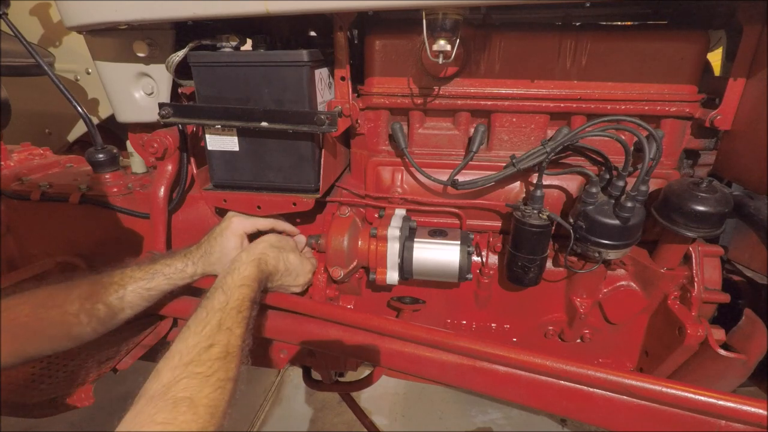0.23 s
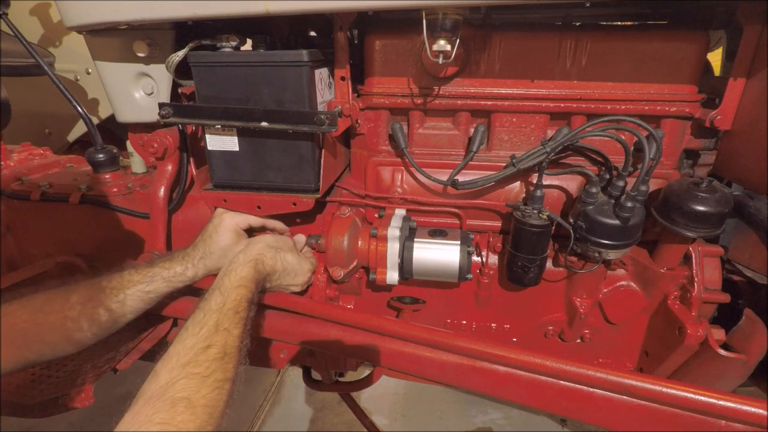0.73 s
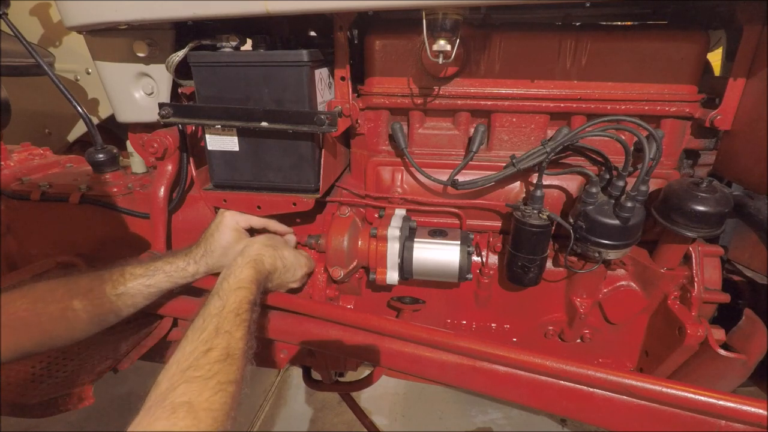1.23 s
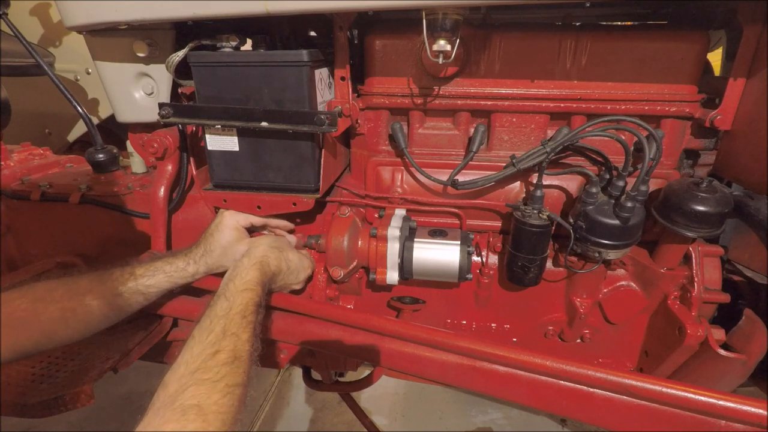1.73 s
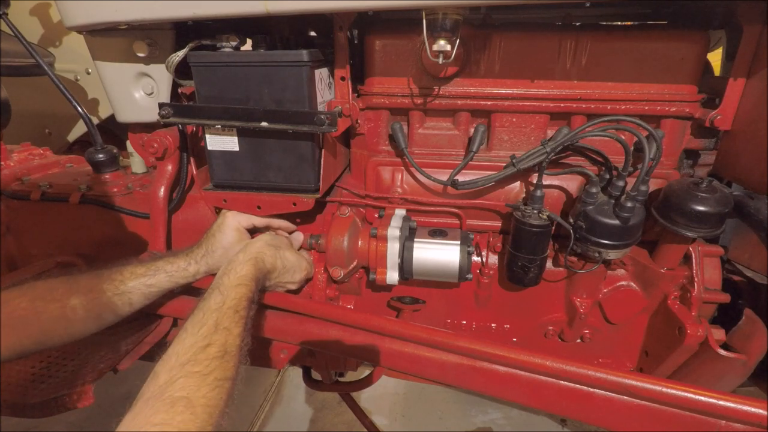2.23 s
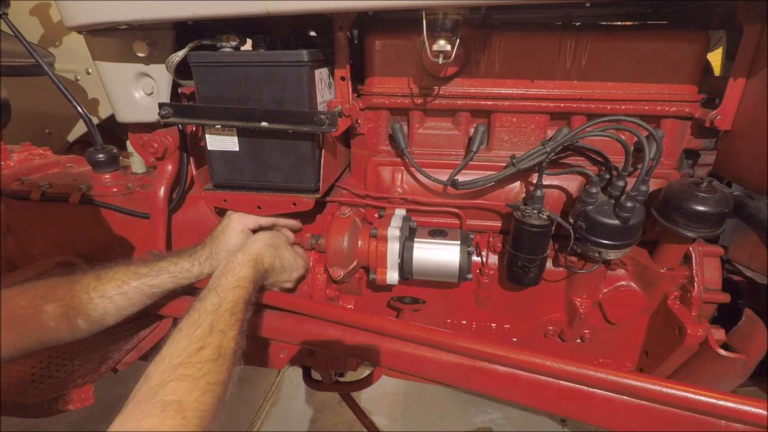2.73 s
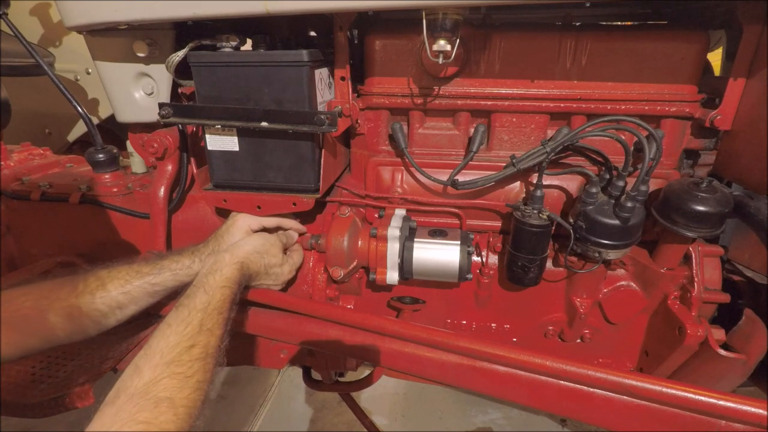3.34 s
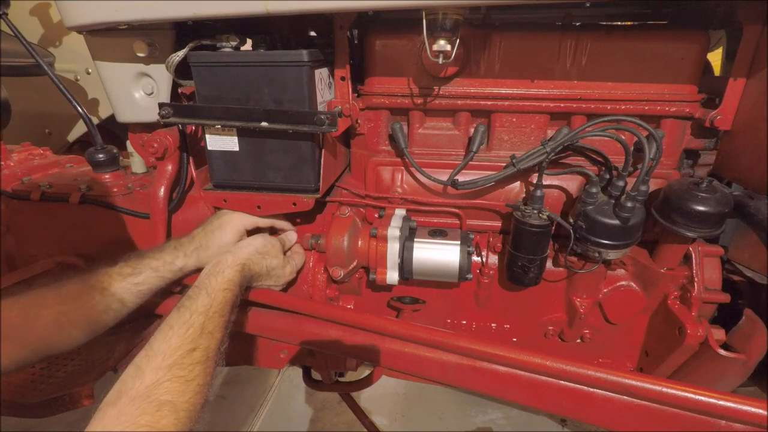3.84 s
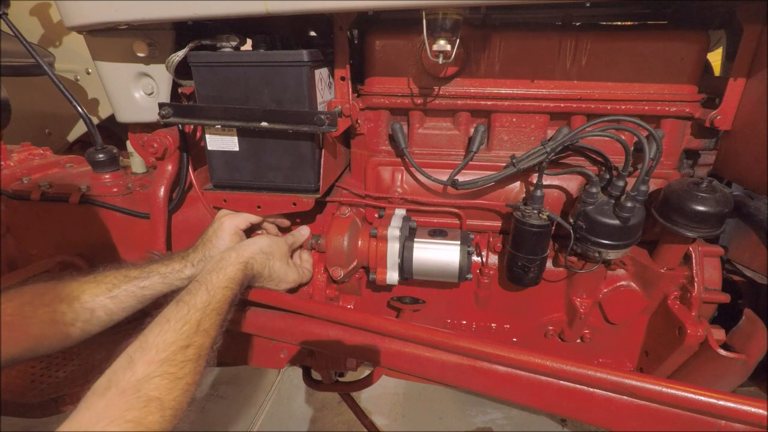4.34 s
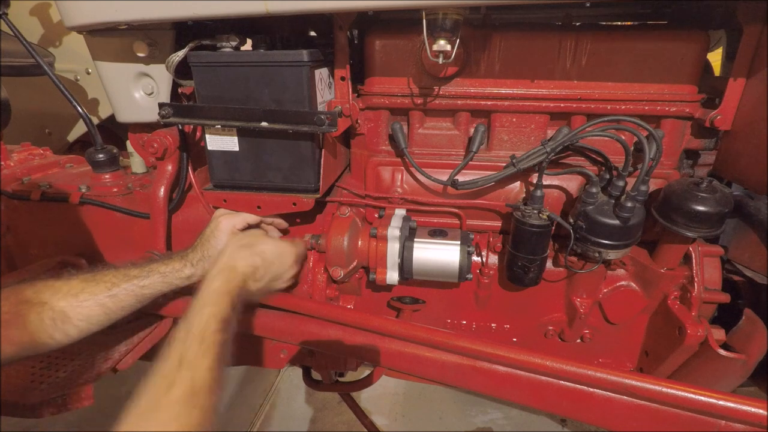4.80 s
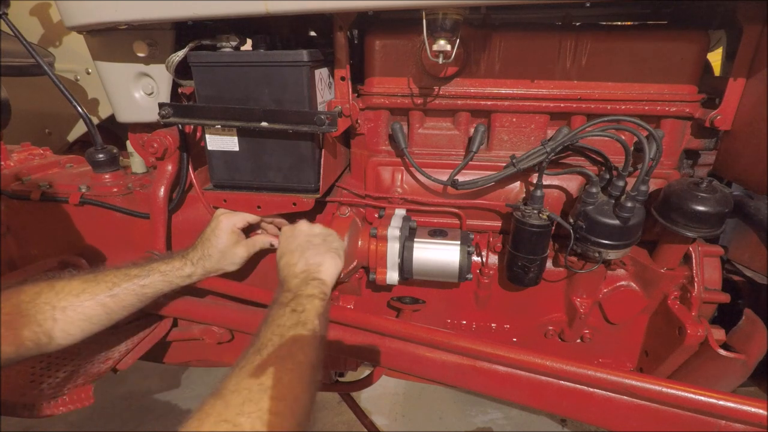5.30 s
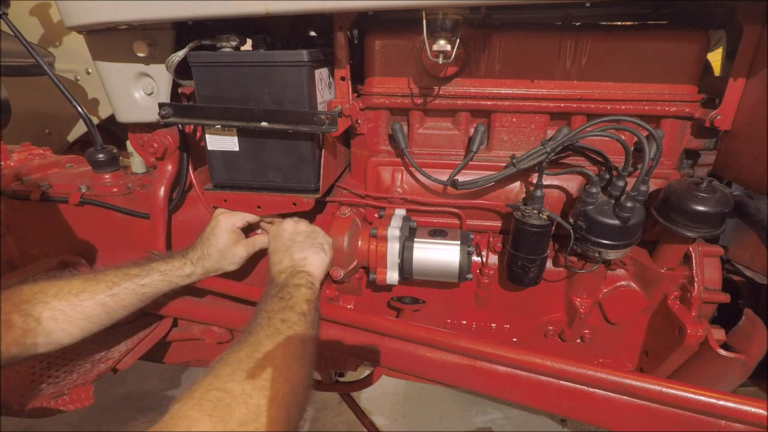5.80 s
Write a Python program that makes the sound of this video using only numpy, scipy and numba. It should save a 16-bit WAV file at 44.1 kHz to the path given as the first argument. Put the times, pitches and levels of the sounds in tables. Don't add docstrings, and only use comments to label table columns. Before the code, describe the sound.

Small dry metallic ticks and soft finger rubs in a humming workshop, broken by two loud bright steel clanks and a few dull echoing thuds.

```python
import sys
import numpy as np
from scipy import signal
from scipy.fft import rfft, irfft, next_fast_len
from scipy.io import wavfile
from scipy.ndimage import uniform_filter1d, map_coordinates
from numba import njit

SR = 44100
rng = np.random.default_rng(int(sys.argv[2]) if len(sys.argv) > 2 else 0)


def undo_db(level):
    steps = np.asarray(level, float) / 20
    return 10 ** steps


def file_out(sig):
    cols = np.atleast_2d(sig).T
    lim = np.clip(cols, -1, 1)
    pcm = np.round(lim * 32767).astype(np.int16)
    wavfile.write(sys.argv[1], SR, pcm)


N = 267246

# (time [s], peak level [dB], centre [Hz], width [octaves])
TICKS = [(.566, -36, 2500, 1.3), (2.0715, -21, 3320, 0.71), (2.69, -36, 2440, 0.8),
         (2.8753, -20, 6800, 0.39), (2.8752, -26.5, 2590, 0.64), (3.431, -30, 10600, 0.17),
         (3.437, -27.5, 3680, 0.13), (3.548, -28, 7740, 0.19), (4.009, -40, 3500, 1.2),
         (4.479, -19.5, 3760, 1.3), (4.5415, -25, 3170, 0.26), (4.5415, -27.5, 8100, .32),
         (4.785, -37, 3000, 1.3), (4.9385, -32, 2000, 0.38), (3.633, -22.5, 4300, 0.73)]
# (time [s], peak level [dB], centre [Hz], width [octaves])
RATTLES = [(.1157, -41.5, 1490, 0.41), (.397, -37.5, 1780, 0.2), (1.7062, -29, 6200, 0.094),
           (5.7835, -30, 6760, 0.1), (.936, -33, 4513, 1.5), (1.3075, -35, 11500, 0.14),
           (1.7062, -26.5, 2490, 0.59), (2.078, -25.5, 2110, 0.35), (2.18, -7.5, 7300, 0.4),
           (2.2048, -11.5, 6600, 0.2), (2.329, -22, 6600, .22), (3.416, -38, 3300, 0.24),
           (4.665, -36, 2670, 0.23), (5.7432, -28, 6600, 0.064), (5.7432, -32, 3200, 0.38),
           (3.428, -32, 6300, .08), (5.7835, -26.5, 2760, 1.9), (5.923, -33, 3340, 0.22)]
# (time [s], length [s], rms level [dB], centre [Hz], width [octaves])
RUBS = [(0.54, 0.043, -46, 4000, 2.2), (1.288, 0.064, -45.5, 2970, 1.2), (1.29, 0.056, -48.5, 11500, 0.27),
        (2.15, 0.011, -39, 3000, 1), (2.276, 0.026, -34, 7500, 1.4), (2.662, 0.09, -52, 5000, 1.5),
        (3.414, 0.038, -43.5, 9000, 0.64), (3.514, 0.06, -49.5, 7500, .6), (3.63, 0.043, -43.5, 4000, 1.1),
        (3.954, 0.09, -49.5, 4040, 1.7), (4.399, 0.046, -44.5, 3200, 0.78),
        (4.405, 0.032, -43.5, 8000, 0.32), (4.428, 0.075, -49, 3180, 1.1), (4.631, 0.062, -47, 6500, .9),
        (5.731, 0.038, -47, 3300, 0.3), (5.763, 0.02, -41, 4870, 1.3), (5.785, 0.08, -49.5, 3180, 0.46),
        (5.801, 0.13, -52, 7500, 0.37)]
# (time [s], peak level [dB], tilt [dB/octave], hall level [dB], hall tilt [dB/octave])
CLANKS = [
    (1.7059, -23, -8, -3.5, -10),
    (2.161, -1.5, 0.5, -3.5, 0),
    (2.2873, -4.5, -1.5, -5, 1.5),
]
# (centre [Hz], width [octaves], level [dB], T60 [s])
STEEL_CLUSTERS = [(1764, 0.19, -1, 0.166), (2320, 0.4, -5.5, 0.25), (3470, 0.14, -8, 0.074),
                  (4100, 0.15, -5, 0.072), (6380, 0.067, 6, 0.066), (7300, 0.083, -2, 0.072),
                  (8460, 0.064, -11, 0.15), (12030, 0.046, -6.5, 0.14), (13000, 0.07, -11, 0.09)]
# (time [s], peak level [dB], centre [Hz], width [octaves], hall level [dB])
KNOCKS = [(.116, -27.5, 404, 0.53, 6), (.395, -34, 597, 0.58, 5), (.56, -35, 900, 0.92, -1.5),
          (1.315, -35.5, 556, 0.72, 3), (1.62, -43, 599, 0.41, 13), (1.708, -28, 665, 0.45, 9.5),
          (2.17, -13, 500, 2, -0.5), (2.236, -29.5, 465, .38, 4), (2.297, -21.5, 600, 1.2, -1),
          (3.203, -33, 700, 1.25, 0.5), (3.434, -34, 800, 1.4, 3.5), (4.542, -28, 1130, 0.51, -4),
          (4.558, -28, 605, .66, -9), (5.787, -25.5, 656, 0.4, -3), (5.925, -34, 920, 1.2, -14)]
# (time
# [s], peak level [dB], centre [Hz], width [octaves], hall level [dB])
THUDS = [(.4, -27.5, 231, 0.72, .5), (2.175, -18, 244, 0.48, -2), (2.071, -28, 1200, 0.74, -2.5),
         (2.2925, -13, 2230, .57, -2), (3.215, -26.5, 440, 0.12, -5), (3.212, -16, 235, .28, -5),
         (3.668, -26, 330, 0.55, -0.5), (3.69, -34, 596, 1.1, -5), (3.728, -37, 1000, .45, -18),
         (3.774, -25, 220, 0.42, -5), (5.781, -26.5, 1400, 0.78, 4), (5.8, -29.5, 318, 0.23, -2.5)]
# (centre [Hz], width [Hz], level [dB])
HOOD_MODES = [(473.6, 11, -1), (572.3, 6.4, 4.5), (635, 15.5, 3), (725, 25, -3.5), (777, 12.5, -8.5),
              (901, 66, -19.5)]
# (frequency [Hz], T60 [s])
HALL_T60 = [(200, 1), (530, 0.72), (1400, 0.74), (3700, 0.56), (9700, 0.42)]
# (frequency [Hz], correlation [-1..1])
ECHO_ALIKE = [(60, 0.36), (300, 1), (750, 0.72), (1400, 0.85), (2200, 0.085), (5000, 0.025), (12000, 0.027)]
# (multiple of shaft rate [-], rms level [dB], waver [dB])
FAN = [(1, -41, 5.5), (2, -37.5, 6), (3, -40.5, 4), (4, -45.5, 3), (5, -43, 1), (6, -45.5, 2),
       (8, -52.5, 2.5), (9, -63, 7)]
# (time [s], pitch [Hz], level [dB])
DRONE = [(.1, 118, -42), (.45, 122.4, -51.5), (.8, 129.8, -43.5), (1.1, 131, -38), (1.5, 133.5, -40),
         (1.8, 134, -45.5), (2.1, 134, -48)]
# (time [s], level [dB])
AIR_LOAD = [(0, -30), (.4, -32.5), (.65, -29.5), (1, -32), (1.9, -32), (2.6, -29.5), (3.3, -30.5),
            (4.3, -34), (4.6, -30), (5, -35), (5.4, -28.5), (5.8, -31.5), (6.06, -33)]
# (frequency [Hz], density [dB/Hz])
RUMBLE = [(12, -21), (28, 8.5), (42, -9.5), (60, 1.5), (100, -2), (135, -19.5), (160, -48), (220, -36.5)]
# (frequency [Hz], density [dB/Hz])
MURMUR = [(88, -40), (150, -3), (185, -2.5), (204, -7.5), (237, -5.5), (459, -19), (510, -24), (554, -19.5),
          (588, -23), (867, -30.5), (2500, -25.5), (3250, -66), (5500, -120)]
# (frequency [Hz], density [dB/Hz])
HISS = [(880, 3), (1500, 1), (2200, -3.5), (2500, -8), (2870, -2.5), (3710, -4), (5840, -4), (14000, -4.5),
        (15800, -6)]
# (frequency [Hz], correlation [-1..1])
AIR_ALIKE = [(60, 1), (150, .98), (280, 0.84), (560, 0.44), (900, 0.069), (2400, -0.16), (6500, -0.19),
             (11000, -0.06)]

SHAFT_HZ = 29.12
OPPOSITE = np.array([[1], [-1]])


def ticks():
    return contacts(TICKS, t60_s=0.017, ring_cycles=13, hall_db=-5)


def rattles():
    return contacts(RATTLES, t60_s=0.031, ring_cycles=60, hall_db=-3)


def contacts(rows, t60_s, ring_cycles, hall_db):
    out = np.zeros((2, N + SR))
    t = np.arange(SR // 10) / SR
    for s, db, hz, octaves in rows:
        decay = undo_db(db - 7 - 60 * t / (t60_s + ring_cycles / hz))
        direct, scattered = (burst(decay, hz, octaves) for _ in range(2))
        direct = direct + undo_db(db) * struck([(hz, 0.85 * octaves * hz, 0)], count=len(t))
        add(out, s, direct + 0.69 * scattered * OPPOSITE)
        add(out, s, undo_db(hall_db) * hall(direct))
    return out[:, :N]


def rubs():
    out = np.zeros((2, N + SR))
    n = SR // 5
    for s, length_s, db, hz, octaves in RUBS:
        swell = np.sin(np.pi * np.clip(np.arange(n) / SR / length_s, 0, 1)) ** 0.78
        grit = undo_db(3.5 * np.repeat(rng.standard_normal(n // 60), 60))
        near, scattered = (band(hz, octaves, count=n) for _ in range(2))
        add(out, s, undo_db(db) * swell * grit * (near + 0.78 * scattered * OPPOSITE))
    return out[:, :N]


def clanks():
    out = np.zeros((2, N + SR))
    for s, db, tilt_db, hall_db, hall_tilt_db in CLANKS:
        pair = undo_db(db - 14.0) * np.array([steel_ring() for _ in range(2)])
        common, scattered = tilted(pair, tilt_db)
        add(out, s, common * undo_db([[-0.7], [0.7]]) + 0.65 * scattered * OPPOSITE)
        add(out, s, undo_db(hall_db) * hall(tilted(pair, hall_tilt_db)[0]))
    return out[:, :N]


def steel_ring():
    t = np.arange(SR // 4) / SR
    ring = burst(undo_db(-1.5 - 60 * t / 0.16), 3700, 1.8)
    for hz, octaves, db, t60_s in STEEL_CLUSTERS:
        envelope = undo_db(db - 60 * t / t60_s) * (1 - np.exp(-t * hz / 12))
        ring = ring + burst(envelope, hz, octaves)
    return ring


def tilted(x, slope_db):
    return filtered(x, lambda hz: undo_db(slope_db * np.log2((hz + 300) / 4000)))


def knocks():
    return blows(KNOCKS, panel_db=-2.5)


def thuds():
    return blows(THUDS, panel_db=-19)


def blows(rows, panel_db):
    out = np.zeros((2, N + SR))
    t = np.arange(SR // 4) / SR
    for s, db, hz, octaves, hall_db in rows:
        blow = undo_db(db - 5.5 - 60 * t / (0.041 + 25 / hz)) * (1 - np.exp(-t * hz / 0.63))
        modes = [(centre, width, level + rng.normal(0, 0.98)) for centre, width, level in HOOD_MODES]
        onset = 1 - np.exp(-t / 0.0017)
        panel = undo_db(db + panel_db + 3.5) * onset * struck(modes, count=len(t))
        sound = burst(blow, hz, octaves) + panel
        add(out, s, sound)
        add(out, s, undo_db(hall_db) * hall(sound))
    return out[:, :N]


def fan():
    turns = 2 * np.pi * SHAFT_HZ * np.arange(N) / SR
    swell = load() / 5
    out = np.zeros(N)
    for multiple, db, waver_db in FAN:
        level = undo_db(db + 2.0 + waver_db * (swell + np.tanh(wobble(5))))
        phase = 2 * np.pi * rng.random() + 0.26 * waver_db * wobble(4)
        out += level * np.sin(multiple * turns + phase)
    return out


def vehicle():
    hz, db = curves(DRONE)
    fade = np.clip((DRONE[-1][0] - np.arange(N) / SR) / 0.12, 0, 1)
    return fade * undo_db(db + 5.5 + 0.83 * wobble(7.82)) * np.sin(2 * np.pi * np.cumsum(hz) / SR)


def building():
    rumble = undo_db(-35.5 + load()) * rush(RUMBLE, AIR_ALIKE, patchy_db=2.0)
    murmur_db = -44.5 + 0.081 * load() - 0.7 * wobble(1.77)
    return rumble + undo_db(murmur_db) * rush(MURMUR, AIR_ALIKE, patchy_db=1.3)


def hiss():
    return undo_db(-46 + 1.85) * rush(HISS, AIR_ALIKE, patchy_db=0.5)


def load():
    load_db, = curves(AIR_LOAD)
    return load_db - load_db.mean()


def scene():
    near = ticks() + rattles() + rubs() + clanks() + knocks() + thuds()
    return near + fan() + vehicle() + building() + hiss()


def hall(sound):
    hz, t, z = signal.stft(rng.standard_normal((2, SR // 2)), SR, nperseg=256)
    decay = undo_db(-60 * t / along(HALL_T60, hz)[:, None])
    buildup = 1 - np.exp(-t / 0.0021)
    tail = signal.istft(z * decay * buildup, SR, nperseg=256)[1]
    tail = spread(tail / np.linalg.norm(tail[0]), np.ones_like, ECHO_ALIKE)
    return signal.fftconvolve(sound[None], tail, axes=1)


def struck(modes, count):
    def response(f):
        return sum(undo_db(db) * 1j * f * w / (c * c - f * f + 1j * f * w) for c, w, db in modes)

    impulse = 1.0 * (np.arange(count) == 0)
    ring = filtered(impulse, response)
    return ring / np.abs(ring).max()


def burst(envelope, centre_hz, octaves):
    shaped = envelope * band(centre_hz, octaves, count=len(envelope))
    return unit(shaped) * np.sqrt(np.mean(envelope ** 2))


def band(centre_hz, octaves, count):
    def bell(hz):
        return np.exp(-0.5 * (np.log2((hz + 1) / centre_hz) / max(octaves, 0.01)) ** 2)

    return unit(filtered(rng.standard_normal(count), bell))


def rush(spectrum, alike, patchy_db):
    z = signal.stft(rng.standard_normal((2, N)), nperseg=512)[2]
    field = uniform_filter1d(rng.standard_normal(z.shape[1:]), size=6, axis=0)
    field = uniform_filter1d(field, size=14, axis=1)
    pair = signal.istft(z * undo_db(patchy_db * unit(field)), nperseg=512)[1][:, :N]
    return unit(spread(pair, lambda hz: undo_db(along(spectrum, hz)), alike))


def spread(pair, gain, alike):
    def response(hz):
        turn = np.arccos(np.clip(along(alike, hz), -1, 1)) / 2
        return gain(hz) * [np.cos(turn), np.sin(turn)]

    mid, side = filtered(pair, response)
    return np.array([mid + side, mid - side])


def filtered(x, response):
    m = next_fast_len(x.shape[-1] + 4096)
    return irfft(rfft(x, m) * response(np.fft.rfftfreq(m, 1 / SR)), m)[..., :x.shape[-1]]


def along(points, hz):
    f, v = np.transpose(points)
    return np.interp(np.log(hz + 1), np.log(f + 1), v)


def curves(rows):
    s, *cols = np.transpose(rows)
    return [np.interp(np.arange(N) / SR, s, c) for c in cols]


def wobble(rate):
    knots = rng.standard_normal(int(N * 30 / SR) + 4)
    return map_coordinates(knots, [np.arange(N) * min(rate, 30) / SR])


def unit(x):
    return x / np.sqrt(np.mean(x ** 2) + 1e-20)


def add(track, s, sound):
    track[..., round(s * SR):][..., :sound.shape[-1]] += sound


@njit
def limiter(peak, top, attack, hold, release):
    gain, goal, wait, out = 1.0, 1.0, 0.0, np.empty(len(peak))
    for i in range(len(peak)):
        need = min(1.0, top / (peak[i] + 1e-9))
        if need < goal:
            goal, wait = need, hold
        elif wait > 0:
            wait -= 1
        else:
            goal = min(1.0, goal * release)
        gain += (goal - gain) * attack
        out[i] = gain
    return out


def top_cut(x):
    return signal.sosfilt(signal.butter(12, 15950, fs=SR, output="sos"), x)


def record(dry):
    top_hz, offset = 15900, -0.0615
    x = filtered(dry, lambda hz: hz < top_hz) + offset
    ahead = np.roll(np.abs(x).max(0), shift=-30)
    gain = limiter(ahead, 0.23, 1 / (0.0004 * SR), 0.02 * SR, undo_db(130 / SR))
    return top_cut(x * gain)


dry = scene()
out = record(dry)
file_out(out)
```